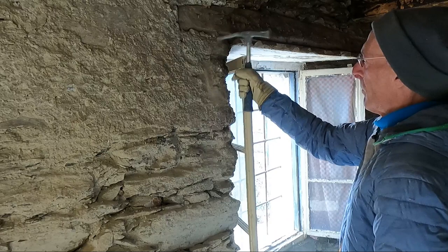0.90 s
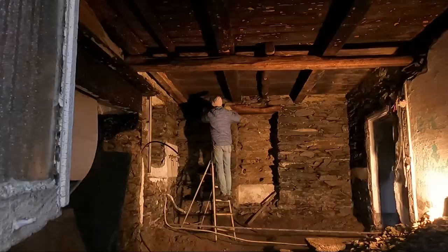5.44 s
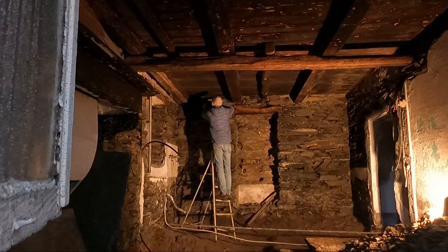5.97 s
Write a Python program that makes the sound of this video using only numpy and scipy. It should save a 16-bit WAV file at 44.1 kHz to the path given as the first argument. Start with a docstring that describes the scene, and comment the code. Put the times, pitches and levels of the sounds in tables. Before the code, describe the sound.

Close by in a bare stone room, steady hammer blows chip away at hard mortar. Each of the thirteen hits is a sharp, crunching knock with a short metallic ring, a deep thud and a quick echo. Crumbs and chips click down after the hits, over a fine hiss of sliding grit and the occasional clink of a hard flake. The work stops suddenly, leaving a faint hush.

```python
"""Above a window of a stone building, a pointed steel hammer hits old, hard mortar: thirteen even blows.
Each one crushes its way in, sets stone and steel ringing and makes the wall boom.
Chips and crumbs fall, a few hard flakes clink, grit trickles down, and the bare room echoes.
The sound cuts off abruptly; a faint hush dips, then returns."""
import sys
import numpy as np
from scipy import signal
from scipy.fft import rfft, irfft, next_fast_len
from scipy.io import wavfile

SR = 44100
rng = np.random.default_rng(int(sys.argv[2]) if len(sys.argv) > 2 else 0)


def digitize_waveform(pressure):
    """Quantize a signal to 16-bit integers and store it at the path in sys.argv[1].

    Rows of a 2-D input are taken as channels; values are limited to [-1, 1].
    """
    field = np.atleast_2d(pressure).T
    bounded = np.clip(field, -1, 1)
    quanta = np.round(bounded * 32767).astype(np.int16)
    wavfile.write(sys.argv[1], SR, quanta)


N = 269451
T = np.arange(int(.7 * SR)) / SR  # the seconds that pass during one hit
STOP_S, TOP_HZ = 5.48, 16000  # when the sound cuts off; the highest pitch kept


def amp(db):
    """Turn decibels into a number to multiply a sound by."""
    return np.exp(np.asarray(db) * np.log(10) / 20)


def along(points, hz):
    """Read a curve of (f/Hz, value) points at hz, giving every octave the same space."""
    freqs, values = np.transpose(points)
    return np.interp(np.log(hz + 1), np.log(freqs + 1), values)


def fade(t60, t=T):
    """Die away by 60 dB in t60 seconds: the 'fade' column of the tables."""
    return np.exp(-np.log(1000) * t / np.maximum(t60, 1e-4))


def unit_energy(x):
    """Scale x so that its total energy is 1."""
    return x / np.sqrt(np.sum(x ** 2) + 1e-20)


def colour(x, *curves):
    """Turn the lows and highs of x up or down by the sum of the (f/Hz, level/dB) curves."""
    size = 2 * next_fast_len(len(x) // 2 + 4096)
    hz = np.fft.rfftfreq(size, 1 / SR)
    gain = amp(sum(along(curve, hz) for curve in curves))
    # folding the cepstrum keeps the filter from sounding before the hit
    cepstrum = irfft(np.log(gain), size)
    cepstrum[1:size // 2] *= 2
    cepstrum[size // 2 + 1:] = 0
    return irfft(rfft(x, size) * np.exp(rfft(cepstrum)), size)[:len(x)]


def crackle(size, spiky_db, clump_s):
    """Many tiny cracks: noise whose strength changes every clump_s seconds."""
    steps = np.arange(size) / SR / clump_s
    strengths = np.clip(rng.standard_normal(size // 8), -2, 2)
    level_db = spiky_db * np.interp(steps, np.arange(len(strengths)), strengths)
    noise = rng.standard_normal(size) * amp(level_db)
    return noise / np.std(noise)


# the tone of still air: f/Hz, level/dB
AIR_TONE = [(25, -6), (90, -16), (165, 5), (300, -6), (700, -12), (1100, -3), (1700, 2.5), (2400, -3.5),
            (3700, -4), (5500, -11.5), (7600, -9), (9000, -19.5), (12000, -24), (14000, -30)]
def air(level_db=-67.5, dip_db=-9, dip_s=0.18):
    """A faint, steady hush that dips when the other sounds cut off, then returns."""
    hush = colour(rng.standard_normal(N), AIR_TONE)
    dip = np.interp(np.arange(N) / SR - STOP_S, [0, dip_s], [1, 0], left=0)
    return amp(level_db + dip_db * dip) * hush / np.std(hush)


# patches of mortar that give way and slide down the wall: t/s, length/s, level/dB
SLIDES = [(0.438, 0.25, -50), (1.863, 0.32, -48.5), (2.044, 0.086, -43.5), (2.264, 0.42, -51),
          (2.7, 0.19, -54), (3.168, 0.43, -52.5), (4.144, 0.25, -46.5), (4.472, 0.54, -55),
          (4.823, 0.12, -50.5), (5.3, 0.19, -55.5)]
def grit_flow(steady_db=-63.5, shaken_db=-51):
    """How strongly the grit runs: a little all the time, more after each blow and in each slide."""
    now = np.arange(N) / SR
    power = np.full(N, amp(steady_db) ** 2)
    for start, *_ in BLOWS:
        age = np.maximum(now - start, 0)
        rise = 1 - np.exp(-age / 0.04)
        power += (amp(shaken_db) * rise * fade(0.6, age)) ** 2
    for start, length, db in SLIDES:
        progress = np.maximum(now - start, 0) / (0.31 * length)  # 1 when the slide runs fastest
        swell = progress * np.exp(1 - progress)
        power += (amp(db) * swell) ** 2
    return np.sqrt(power)


# the tone of running grit: f/Hz, level/dB
GRIT_TONE = [(60, -13.5), (250, -11), (700, 6), (1600, 0.5), (3200, 3), (5000, -0.5), (7500, -2.5),
             (10000, -10), (12300, -11.5), (13500, -21), (16000, -33)]
def trickle(grains_per_s=400):
    """Loose grit runs down the wall: a fine hiss, and bigger grains that each tick at their own pitch."""
    hiss = crackle(N, spiky_db=3.5, clump_s=0.0035)
    count = int(grains_per_s * N / SR)
    pitch, strength = rng.standard_normal((2, count, 1))
    starts = rng.integers(0, N, (count, 1))
    hz = np.clip(3200 * np.exp(.65 * pitch), 300, 14000)
    t = T[:SR // 80]
    gain = amp(8.9 * np.clip(strength, -2, 2)) * np.sqrt(hz)
    ticks = gain * np.sin(2 * np.pi * hz * t) * fade(11 / hz, t)  # small grains: higher and shorter
    positions = starts + np.arange(len(t))
    grains = np.bincount(positions.ravel(), ticks.ravel(), N)[:N]
    grit = colour(hiss + 0.33 * grains / np.std(grains), GRIT_TONE)
    return grit_flow() * grit / np.std(grit)


def add(track, start, x):
    """Mix x into the track, beginning at start seconds."""
    i = max(0, round(start * SR))
    track[i:i + len(x)] += x[:max(0, len(track) - i)]


def later(x, seconds):
    """Delay x, keeping its length."""
    return np.pad(x, (max(0, round(seconds * SR)), 0))[:len(x)]


# the tone of steel hitting mortar: f/Hz, level/dB
MORTAR_TONE = [(25, -27), (80, -17.5), (170, 2.5), (320, -3.5), (560, 0.5), (1150, 1), (1900, -4.5),
               (2800, -2.5), (4800, -13), (7500, -21.5), (10500, -41), (12000, -35), (13200, -43),
               (16000, -57.5)]
def mortar_knock(crush_s, hardness):
    """The point crushes the crust for crush_s seconds, then stops with a jolt."""
    crust = crackle(len(T), spiky_db=-3.0, clump_s=0.00014)
    crust *= np.where(T < crush_s, 1, fade(0.011, np.abs(T - crush_s)))
    crust = 0.026 * colour(crust, [(200, -11.5), (1200, 4.0), (4000, 6.5), (9000, 21.5)])
    # one push, then a crackle for the breaking mortar and the echoes off the window's sides
    cracks = unit_energy(crackle(len(T), spiky_db=0.5, clump_s=0.00036) * fade(0.048))
    jolt = 0.59 * (T == 0) + 0.61 * cracks
    return colour(crust + later(jolt, crush_s), MORTAR_TONE, hardness)


def ring(notes, scatter_db, waver, attack_s):
    """A struck thing rings its own notes, at new strengths each hit; rubbing mortar shakes their pitch."""
    tones = np.zeros(len(T))
    for hz, db, t60 in notes:
        wobble = np.interp(T / .004, np.arange(200), rng.standard_normal(200))
        phase = 2 * np.pi * hz * np.cumsum(1 + waver * wobble) / SR
        gain = amp(db + scatter_db * np.clip(rng.standard_normal(), -1, 1))
        tones += gain * fade(t60) * np.sin(phase)
    return tones * (1 - np.exp(-T / attack_s))


def stone_ring(hz, width=0.097, t60=0.17):
    """A stone set in the wall rings with many close notes: a short, hollow band of noise."""
    freqs = np.fft.rfftfreq(len(T), 1 / SR)
    peak = 1 / (1 + ((freqs / hz - 1) / width) ** 2)
    band = irfft(rfft(rng.standard_normal(len(T))) * peak, len(T))
    return unit_energy(band * fade(t60) * (1 - np.exp(-T / 0.0028)))


# how long the bare stone room echoes at each pitch: f/Hz, fade/s
ROOM_FADES = [(60, 0.47), (250, 0.52), (750, 0.39), (2000, 0.28), (5000, 0.33), (13000, 0.23)]
def in_room(x, echo_db, build_s):
    """Add the room's wash of echoes, which builds up over about build_s seconds."""
    hz, t, noise = signal.stft(rng.standard_normal(len(x)), SR, nperseg=256)
    fading = noise * fade(along(ROOM_FADES, hz)[:, None], t)
    tail = signal.istft(fading, SR, nperseg=256)[1][:len(x)]
    tail = unit_energy(tail * (1 - np.exp(-T[:len(x)] / build_s)))
    return x + amp(echo_db) * signal.fftconvolve(x, tail)[:len(x)]


# the notes of the steel hammer head: f/Hz, level/dB, fade/s
STEEL_NOTES = [(2553, -32.5, 0.031), (2920, -36, 0.16), (3430, -47, 0.08), (7220, -42.5, 0.12),
               (8380, -41, 0.069), (11730, -49.5, 0.023)]
# the deep notes of wall and room: f/Hz, level/dB, fade/s
WALL_NOTES = [(25.8, -37, 0.51), (46.86, -38, 0.58), (60.9, -27, 0.44), (82.34, -26, 0.36),
              (100.35, -37.5, 0.51), (112.2, -41, 0.54), (162.8, -30.5, 0.27), (211.7, -29, 0.22),
              (375, -35, 0.28)]
# the hammer blows, with how far each part is turned up or down:
# t/s, crushing time/s, force/dB, thud/dB, crack/dB, grit/dB, boom/dB, stone f/Hz, stone/dB, steel/dB
BLOWS = [(0.0158, 0.0035, 16.5, 3, 1.5, -3, 2, 670, -5.5, -8.5),
         (0.422, 0.0009, 21, 8.5, -2, -16.5, 2.5, 603, -0.5, 3.5),
         (0.846, 0.0026, 15.5, 12, 2, 1.5, 1, 548.5, 4.5, -19),
         (1.2671, 0.00058, 19.5, -0.5, -6.5, -7.5, -8.5, 542, -2.5, -1.5),
         (1.6984, 0.0011, 16, -4.5, -2.5, -2.5, 0, 543, -4.5, 4),
         (2.121, 0.003, 12.5, 2.5, 0, -0.5, -3.5, 597, -9.5, -2.5),
         (2.546, 0.0034, 8, 6, -2, 2.5, -1.5, 550, -10.5, 3),
         (2.9855, 0.0025, 10, 2, 3, 5, 0.5, 1150, -2, 1),
         (3.4266, 0.001208, 14, 10.5, 2, -0.5, 1.5, 557, -7.5, -6),
         (3.860, 0.0058, 15.5, 2.5, 0, 0, -0.4, 1280, -9.5, 4.5),
         (4.2998, 0.00071, 16.5, -9, -9, 0.5, -4, 1035, -5.5, -5),
         (4.724, 0.001426, 16.5, -0.5, -6, 0, -0.5, 986, -2.5, -3),
         (5.1434, 0.0016, 14.5, 3, -4, 5.5, 0.5, 616, -4.5, 1.5)]
def hammer():
    """Each blow knocks into the mortar and sets steel, stone and wall ringing."""
    out = np.zeros(N)
    for start, crush_s, force_db, thud_db, crack_db, grit_db, boom_db, *ringing in BLOWS:
        stone_hz, stone_db, steel_db = ringing
        # every spot has its own hardness, and so its own tone
        hardness = [(250, thud_db), (550, 0), (1200, 0),
                    (2700, crack_db), (5800, grit_db), (11000, grit_db / 2)]
        knock = amp(force_db) * mortar_knock(crush_s, hardness)
        steel = amp(steel_db) * ring(STEEL_NOTES, scatter_db=8.5, waver=0.015, attack_s=0.00083)
        stone = amp(stone_db) * stone_ring(stone_hz)
        add(out, start, in_room(knock + later(steel + stone, crush_s), echo_db=-7.5, build_s=0.018))
        # the heavy wall is slow to start swinging
        boom = amp(boom_db) * ring(WALL_NOTES, scatter_db=1.5, waver=0.072, attack_s=0.011)
        add(out, start + crush_s, boom)
    return out


# the tone shared by all the small crunches of mortar: f/Hz, level/dB
CRUNCH_TONE = [(40, -16.5), (200, -6.5), (500, 1), (3000, 1), (8000, 1.5), (10500, -10), (12000, -5),
               (13500, -20), (16000, -21)]
def crunch(length_s, tone):
    """One bit of mortar breaks up in a short crackle with a tone of its own."""
    t = T[:SR // 4]
    shatter = crackle(len(t), spiky_db=3.5, clump_s=0.0015)
    burst = unit_energy(shatter * fade(length_s, t) * (1 - np.exp(-t / 0.00055)))
    return in_room(colour(burst, CRUNCH_TONE, tone), echo_db=-8.5, build_s=0.00079)


# chips landing, and a short scrape of the point just before the second blow:
# t/s, length/s, knock/dB, click/dB, fizz/dB
CHIPS_AND_SCRAPE = [(0.1945, 0.017, -14, -12.5, -25.5), (0.281, 0.022, -2.5, -11, -16.5),
                    (0.406, 0.053, -3, 4, 3.5), (0.486, 0.066, 8, -11.5, -8.5),
                    (0.648, 0.1, -2.5, -7, -5.5), (0.73, 0.027, -21, -16.5, -21),
                    (0.7744, 0.07, -20, -23.5, -14.5), (1.03, 0.14, -15.5, -12, -19.5),
                    (1.092, 0.015, -3, -22.5, -29.5), (1.215, 0.039, -10, -8.5, -16.5),
                    (1.348, 0.018, -14, -13.5, -12), (1.488, 0.01, -35, -39, -10.5),
                    (1.548, 0.041, -17.5, -9.5, -23), (1.5777, 0.06, -18, -17, -10),
                    (1.656, 0.028, -18, -15, -23.5), (1.875, 0.036, -5.5, -19, -35),
                    (1.921, 0.046, -7, -8, -5), (1.994, 0.054, -2.5, -7.5, -39.5),
                    (2.046, 0.023, -9, 10, -6.5), (2.292, 0.19, -8.5, -8, -21),
                    (2.496, 0.068, -3, -19, -21.5), (2.559, 0.017, 14, -25, -3),
                    (2.63, 0.065, -2, -0.5, -6.5), (2.835, 0.12, -38, -22, -17.5),
                    (2.9378, 0.08, -20, -1.5, -7), (3.196, 0.049, -2.5, -14.5, -20.5),
                    (3.261, 0.12, -16, -4.5, -12.5), (3.28, 0.025, -1, -18, -14),
                    (3.6023, 0.07, -11, -9, -20.5), (4.077, 0.062, -35, -32, -13.5),
                    (4.103, 0.026, -4.5, -13, -30), (4.2087, 0.0059, -25, -3.5, -18),
                    (4.227, 0.05, -26, -5.5, -17), (4.276, 0.064, -14, 1, -9),
                    (4.64, 0.11, -41, -16, -11.5), (4.936, 0.088, -8.5, -9, -44.5),
                    (5.0373, 0.019, -37, -17.5, -31), (5.1046, 0.046, -18, -6, -18),
                    (5.136, 0.023, -12, -0.5, -15.5), (5.34, 0.038, 1.5, -13, -20),
                    (5.451, 0.037, -7, -17, -43)]
def chips_and_scrape():
    """Chips land with a click, heavy ones with a dull knock; once, the point scrapes the mortar."""
    out = np.zeros(N)
    for start, length_s, knock_db, click_db, fizz_db in CHIPS_AND_SCRAPE:
        add(out, start, crunch(length_s, [(700, knock_db), (2500, click_db), (8500, fizz_db)]))
    return out


# how much softer a small crumb is than a chip: f/Hz, level/dB
CRUMB_TONE = [(700, -21.5), (2500, -25), (8500, -29)]
def crumbs(per_blow=3, fall_s=0.15, spread_s=0.2, scatter_db=2.5):
    """Every blow drops a few crumbs, which land one by one at random moments, no two alike."""
    out = np.zeros(N)
    for start, *_ in BLOWS:
        falls = fall_s + spread_s * (np.arange(per_blow) + rng.random(per_blow)) / per_blow
        nudges_db = scatter_db * rng.standard_normal((per_blow, len(CRUMB_TONE)))
        for fall, nudges in zip(falls, nudges_db):
            tone = [(hz, db + nudge) for (hz, db), nudge in zip(CRUMB_TONE, nudges)]
            add(out, start + fall, crunch(length_s=0.028, tone=tone))
    return out


# hard flakes that clink: t/s, f/Hz, level/dB, fade/s
FLAKES = [(2.2428, 4540, -30.5, 0.027), (4.1238, 4500, -21.5, 0.024), (4.642, 5000, -46.5, 0.36)]
def flakes():
    """A hard flake lands with a tick and rings on one high note."""
    out = np.zeros(N)
    for start, hz, db, t60 in FLAKES:
        burst = rng.standard_normal(len(T)) * fade(0.11)
        tick = 0.25 * colour(burst, [(1500, -20), (4000, 2), (9000, -6.0), (15000, -12.5)])
        note = ring([(hz, 0, t60)], scatter_db=3.5, waver=0.016, attack_s=0.00064)
        add(out, start, amp(db) * in_room(note + tick, echo_db=-22.5, build_s=.008))
    return out


def scene():
    """Hammer and falling mortar sound over the still air, then cut off abruptly."""
    work = hammer() + chips_and_scrape() + flakes() + crumbs() + trickle()
    cut_off = np.clip((STOP_S - np.arange(N) / SR) / 0.0022, 0, 1)
    return (work * cut_off + air())[None]


def record(dry):
    """Take away everything higher than TOP_HZ."""
    size = next_fast_len(N + SR // 2)
    kept = np.fft.rfftfreq(size, 1 / SR) < TOP_HZ
    return irfft(rfft(dry, size) * kept, size)[:, :N]


dry = scene()
out = record(dry)
digitize_waveform(out)
```